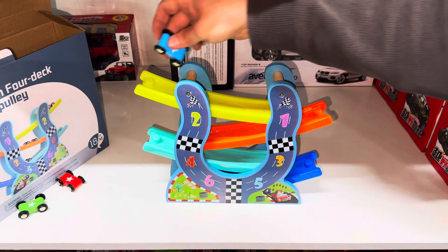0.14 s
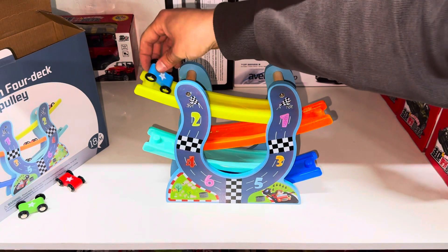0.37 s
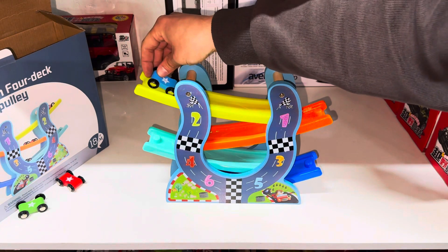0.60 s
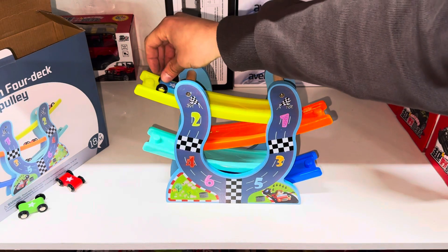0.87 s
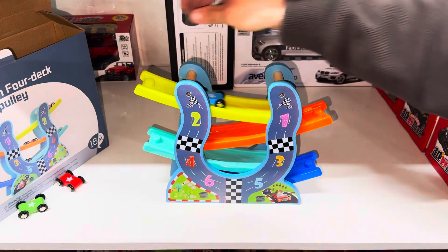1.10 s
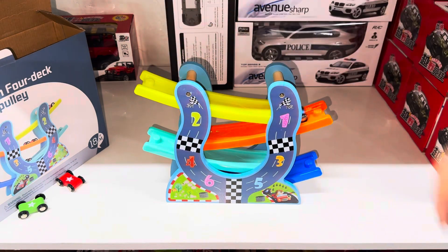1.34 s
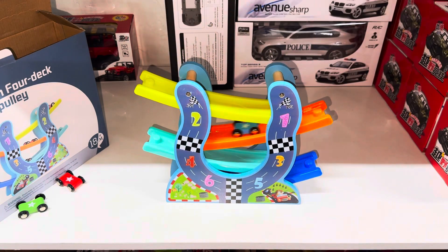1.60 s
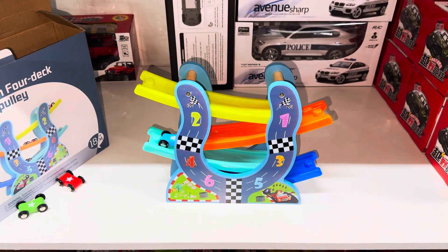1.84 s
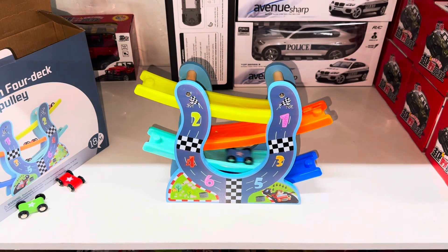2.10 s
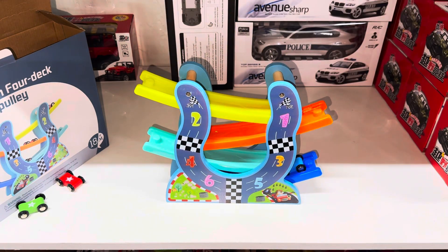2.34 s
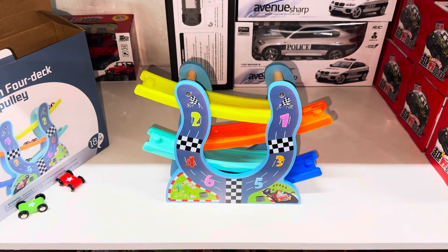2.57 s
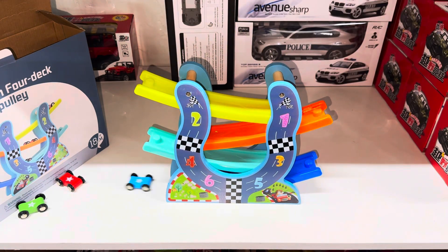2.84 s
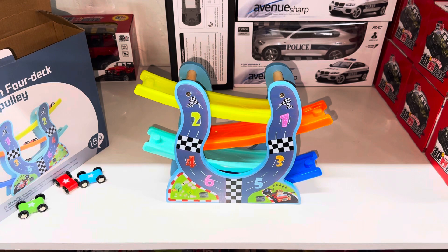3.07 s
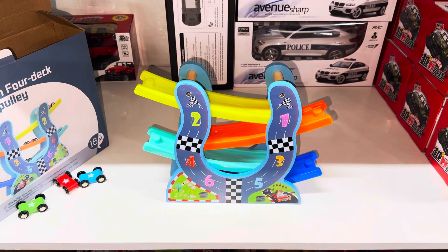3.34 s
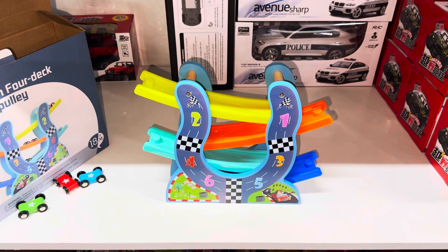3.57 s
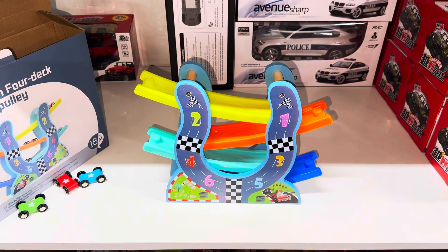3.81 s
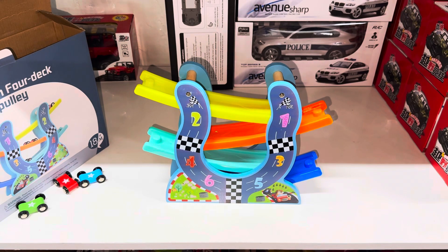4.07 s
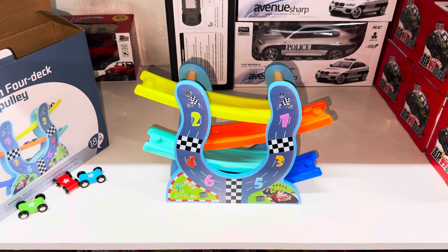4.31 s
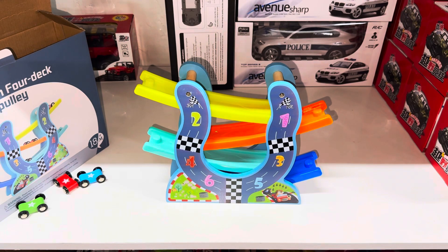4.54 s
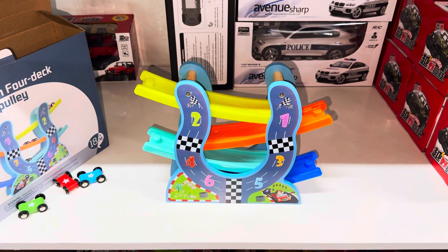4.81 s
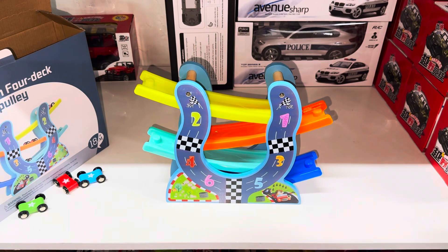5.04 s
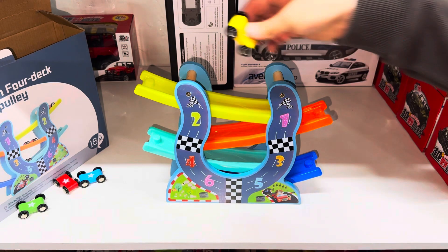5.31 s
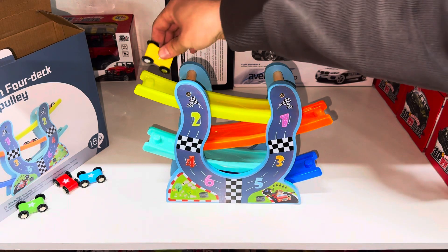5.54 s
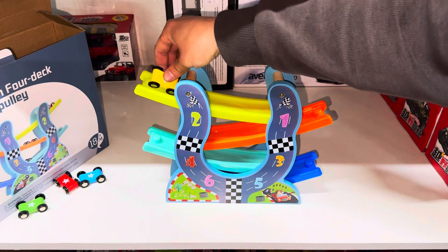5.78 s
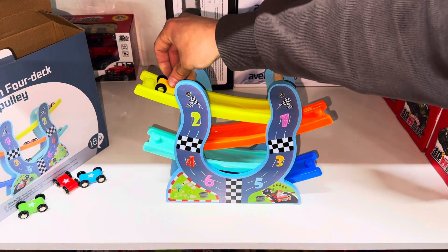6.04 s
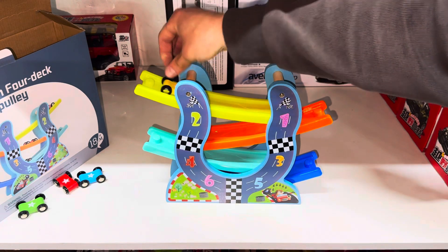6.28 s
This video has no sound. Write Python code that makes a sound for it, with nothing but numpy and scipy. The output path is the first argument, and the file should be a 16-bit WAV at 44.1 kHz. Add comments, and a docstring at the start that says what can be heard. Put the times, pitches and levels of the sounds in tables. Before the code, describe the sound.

A small toy car clicks onto a plastic ramp, rattles down four levels with sharp clacks, then stiff plastic wrapping crackles and another car is set down.

```python
"""On a table top with a four-level zigzag ramp, a small toy car is set down, rattles down each slope and
clacks as it flips to the next: short noise bursts and struck modes for the blows, resonated noise for the rolling.
To the right a hand rustles in stiff plastic wrapping (noise snaps over fine crackle) and bumps the box and table
(falling sines); then the next car is set on the top slope. A faint motor hum, a wavering sine, and a low noise that
swells and sinks lie behind, and short dense echoes surround it all, as two microphones hear it from close by."""
import sys
import numpy as np
from scipy import signal
from scipy.fft import rfft, irfft
from scipy.io import wavfile

SR = 44100
rng = np.random.default_rng(int(sys.argv[2]) if len(sys.argv) > 2 else 0)


def rack_gain(trim_db):
    """Turn a fader trim in dB into the linear factor to multiply a signal by."""
    fader = np.asarray(trim_db, float)
    return 10 ** (fader / 20)


def log_audio(samples):
    """Write samples as a 16-bit WAV file to the path given in sys.argv[1]."""
    # one column per channel
    frames = np.atleast_2d(samples).T
    # limit to full scale, then quantise
    limited = np.clip(frames, -1, 1)
    pcm = np.round(limited * 32767).astype(np.int16)
    wavfile.write(sys.argv[1], SR, pcm)


N = 282240

# Motor tone. Each row: time in seconds, mean pitch in Hz, mean level in dB.
MOTOR_HUM = [(0.0, 85.6, -66.5), (0.8, 81, -67.5), (1.7, 88.2, -66), (2.56, 77.2, -54), (2.9, 70.3, -77),
             (3.07, 71.8, -55.5), (3.58, 90.5, -67), (3.68, 89.2, -52), (3.9, 101.4, -74.5)]
# Spectrum of the low background noise. Each row: frequency in Hz, density in dB per Hz.
LOW_NOISE_SHAPE = [(15, -30), (25, -10), (49, -4), (97, -13.5), (120, -8), (137, -24.5), (200, -16.5),
                   (7920, -33), (9320, -35), (10100, -26.5), (16000, -55)]
# The low background noise swells and sinks. Each row: time in seconds, relative level in dB.
LOW_NOISE_LEVEL = [(0.0, -50.5), (0.2, -54), (0.26, -69), (0.9, -61), (1.3, -53), (2.6, -56), (3.2, -54.5),
                   (4.13, -50), (4.8, -53), (5.33, -49), (5.74, -75.5), (5.95, -45.5), (6.25, -70.5),
                   (6.4, -57)]
# Correlation of left and right. Each row: frequency in Hz, likeness from 0 to 1.
LIKENESS = [(60, .99), (300, .93), (900, .88), (2000, .8), (5000, .75), (15000, .75)]
# Frequencies at which the thud, body, peak and tick levels of a blow hold. Each entry: frequency in Hz.
COLOUR_HZ = [300, 1400, 4200, 10500]
EDGES_HZ = 45 * 2 ** np.arange(0, 8.6, .5)   # half-octave bands

# Blows that ring the table top. Each row: time in seconds, level in dB.
TABLE_BLOWS = [(0.349, -51), (0.43, -48.5), (0.694, -46), (1.288, -30.5), (1.378, -41.5), (1.738, -37.5),
               (1.825, -38), (2.198, -41), (2.288, -36.5), (5.741, -71), (5.977, -36.5)]
# Modes of the table top. Each row: frequency in Hz, level in dB, time to fall 60 dB in seconds.
TABLE_MODES = [(117.5, -1.5, 0.17), (164, 0, 0.11), (230, 1, 0.044), (343, -4.5, 0.11)]

# The hand bumps the box and table. Each row: start in seconds, starting level in dB, first and settled pitch in Hz.
BUMPS = [(3.824, -45, 900, 301), (4.156, -38.5, 261, 78), (4.359, -33, 298, 156), (4.665, -21, 775, 695),
         (4.687, -26.5, 420, 194), (4.753, -29, 260, 171), (4.765, -28, 213, 96), (4.777, -30, 300, 130),
         (4.793, -32, 350, 150), (4.822, -23, 890, 86)]
# Snaps of the wrapping. Each row: time in seconds, peak level in dB, body and tick levels in dB re peak.
SNAPS = [(3.027, -38.5, -7.5, 4), (3.051, -31, -22, 2), (3.0726, -33, -44, 1), (3.1055, -22, -15, -6.5),
         (3.2094, -26, -22, -2.5), (3.216, -48, -19, 2), (3.243, -27, -18, -4), (3.3195, -27, -6.5, -8),
         (3.3557, -21, -24, -11), (3.3964, -26, -8, -5), (3.4072, -31, -13, -4), (3.4144, -30.5, -32, -2),
         (3.4508, -24, -26, -9), (3.4584, -31, -10, -5), (3.5002, -30.5, -14, -6), (3.5255, -28, -21, -7),
         (3.55, -49, -36, -5), (3.6134, -28.5, -12, 1.5), (3.6398, -18.5, -31, -20),
         (3.6875, -22.5, -14.5, -17), (3.7166, -27.5, -26, 1), (3.8252, -36.5, -13.5, -6.5),
         (3.8947, -46, -28, -1), (3.989, -54, 0.5, -31), (4.015, -51, -14, -14), (4.05, -42.5, -6, -7),
         (4.06, -45, -17, -6), (4.0875, -28, -12, 2), (4.105, -36, -19, -6), (4.148, -19, -16, -12),
         (4.1968, -25, -24, -11), (4.2685, -15.5, -28.5, -20.5), (4.2971, -35, -29, 2),
         (4.3346, -27, -16, -12), (4.343, -16, -21, -11.5), (4.3521, -23, -18, -7),
         (4.369, -17.5, -25, -13), (4.4516, -26.5, -14.5, -16), (4.4697, -25, -23, -6),
         (4.4904, -24.5, -17, -13.5), (4.5213, -13, -44, -20), (4.5395, -34, 1, -1),
         (4.5863, -28, -20, -32), (4.6622, -15.5, -26, -18.5), (4.7482, -26, -6, 1), (4.779, -21, -18, 3.5),
         (4.793, -31, -8, -17), (4.8219, -15.5, -13, -13.5), (4.922, -72, -4, -25),
         (5.0526, -39.5, -14, -24), (5.1562, -43, 1, -17), (5.3016, -52, 4, -28), (5.383, -54.5, 3, -20),
         (5.46, -69, 3.5, -20)]
# Ringing of a snap. Each row: frequency in Hz, time to fall 60 dB in seconds.
SNAP_T60 = [(200, 0.023), (700, 0.037), (2000, 0.078), (15000, 0.0194)]
# Spectrum of a snap. Each row: frequency in Hz, level in dB per band.
SNAP_SHAPE = [(70, -30.5), (300, -6), (1000, -4), (4500, -18.5), (9000, -10.5), (15000, -8)]
# Hand in the wrapping. Each row: time in seconds, relative level in dB, relative level of the lows in dB.
RUSTLE = [(2.95, -50, -9), (3.18, -51, 12), (3.274, -58, 3.5), (3.362, -48.5, 4.5), (3.54, -58.5, -4.5),
          (3.73, -61.5, -2), (3.78, -69, 4), (3.9, -61.5, 3.5), (3.97, -63.5, 4), (4.2, -58.5, 5),
          (4.6, -58.5, 5.5), (4.71, -42.5, 2.5), (4.75, -37, -2), (4.8, -46, 14), (4.83, -79, 1),
          (4.9, -74.5, 3), (5.1, -61.5, -2), (5.248, -73, 9), (5.4, -74.5, 17), (5.5, -96, 15),
          (5.6, -101, -10)]
# Spectrum of the crackle. Each row: frequency in Hz, density in dB per Hz.
RUSTLE_SHAPE = [(35, -30), (60, -7.5), (469, -4.5), (553, -4), (991, -1.5), (7940, -12.5), (9790, -13.5),
                (11000, -22.5), (14600, -12), (16000, -45)]
# Unlike paths from the wrapping. Each row: frequency in Hz, lead of the left side in radians.
WRAP_PHASE = [(20, -0.5), (300, -0.86), (1120, -2), (2330, -2), (4050, -5), (6800, -5.5), (20000, -7)]

# The car scrapes into place, creeps off as the hand lets go, runs down four slopes and along the table; a late run
# follows on the top slope. Each row: time of full speed in seconds, time spent speeding up in seconds,
# later fall in dB per second, level in dB, rumble and hiss levels in dB re that level.
RUNS = [(0.44, 0.23, 355, -67, 3, -6), (1.002, 0.13, 38.5, -48.5, 5, -32),
        (1.131, 0.26, 79.5, -37.5, -1, -19), (1.631, 0.39, 99, -35.5, 2.5, -10.5),
        (1.96, 0.27, 24, -39.5, 4, -11.5), (2.588, 0.29, 132, -37, 8, -11), (2.75, 0.17, -13, -48.5, 1, -6),
        (6.39, 0.16, 22, -40.5, -1, -22)]
# Moments when the car leaves each slope, then stops. Each entry: time in seconds.
SLOPE_ENDS_S = [1.285, 1.74, 2.2, 2.7, 3.1]
# Hollow plastic slopes from top to bottom, then the table top, each a list of resonances.
# Each row: frequency in Hz, least width in Hz, relative level in dB.
SLOPES = [
    [(1230, 200, 2), (2410, 20, -4.5), (2900, 38, -3.5), (3440, 40, -2.5), (3860, 60, -15), (4460, 160, -5),
     (5597, 33, -19)],
    [(894, 60, 1.5), (1800, 110, 3.5), (2370, 20, -12), (2830, 54, -5), (3450, 160, -10), (4320, 170, -3.5),
     (4960, 35, -5)],
    [(750, 60, 9), (900, 75, 8), (1760, 190, 2.5), (2960, 39, -14.5), (3640, 160, 2), (4380, 280, -10.5),
     (4700, 450, -5)],
    [(736, 61, -4.5), (900, 69, 2), (1060, 72, 7), (1700, 97, -5), (2170, 53, 0), (2940, 80, 1.5),
     (3520, 200, 3.5), (4250, 160, -15)],
    [(343.4, 48, 5.5), (749, 65, 1.5), (2230, 95, 3), (2720, 39, 0), (5240, 97, -12)],
]
# Spectrum of rolling. Each row: frequency in Hz, density in dB per Hz.
ROLL_SHAPE = [(35, -36), (60, -22.5), (732, -9.5), (882, -5.5), (1470, -7.5), (4320, -10), (10800, -21.5),
              (12700, -33.5), (14600, -13), (16000, -48)]

# Car against ramp. Each row: time in seconds, peak level in dB, body and tick levels in dB re peak,
# pitch that the blow favours in Hz, lift of the modes there in dB.
KNOCKS = [(0.09, -39.5, -10, 16.5, 3250, 22.5), (0.198, -81, 14, -18, 2050, 23),
          (0.346, -17, -7.5, -8.5, 3130, 22.5), (0.429, -44, 2, -2.5, 930, 25),
          (0.626, -58, 17, -38, 750, 10), (0.652, -39, 10, -13, 1700, 8),
          (0.682, -9, -10.5, -15, 3900, -2.5), (0.692, -9.5, -21.5, -5.5, 3840, 15),
          (0.815, -51.5, -7.5, -10, 420, 16), (0.869, -40.5, 11, -12, 1900, 0),
          (0.993, -33.5, 12, -28, 1300, 4), (1.016, -28.5, -6, -29, 4520, 25),
          (1.036, -20, -9, -28, 1940, 12), (1.052, -24.5, -3.5, -20, 2000, 5.5),
          (1.065, -26, -3, -17, 1340, 22), (1.08, -31, 0, -26.5, 3500, 15.5),
          (1.123, -27, -6.5, -16, 1040, 25), (1.129, -23, -18.5, -17, 3450, 16),
          (1.141, -17, -17.5, -12.5, 3810, 18), (1.189, -20, -15, -22, 4500, 14),
          (1.272, -27, -2, -32, 1290, 16), (1.283, -13, -8.5, -10, 1500, 10.5),
          (1.285, -4.5, 1.5, -9.5, 1710, 15), (1.31, -15, -27, -19, 2400, 23),
          (1.335, -15.5, 9, -23.5, 2600, 11), (1.355, -7, -19.5, -19.5, 2670, 23),
          (1.377, -1, -5.5, -13, 1390, 12), (1.475, -31, -2, -15, 1800, 7),
          (1.531, -26.5, -4, -21, 1800, 15.5), (1.54, -27, -17.5, -20, 4700, 13),
          (1.549, -32, -12.5, -33, 4300, 18), (1.579, -36, -15, -20.5, 3500, 8),
          (1.599, -30, -11, -22, 4300, 12), (1.606, -13.5, -9.5, -18, 4340, 7.5),
          (1.634, -24, -7.5, -13, 1760, 24.5), (1.659, -29, -3.5, -18.5, 900, 17),
          (1.709, -22, -14, -33, 1760, 24), (1.735, -2, -22.5, -6, 1677, 19.5),
          (1.738, -6, -5, -17.5, 894, 30.5), (1.786, -7.5, -5.5, -18.5, 2410, 9.5),
          (1.823, -1, -11.5, -12.5, 1034, 20), (1.852, -14.5, -18, -14.5, 755, 12),
          (1.921, -22.5, 2, -5, 780, 21.5), (2.034, -25.5, 9, -27.5, 930, 33),
          (2.055, -15, -8, -20.5, 900, 24.5), (2.076, -21.5, -15.5, -8, 750, 5.5),
          (2.0865, -30.5, 8, -23, 900, 34.5), (2.097, -19, -2.5, -23.5, 930, 26),
          (2.1965, -15.5, -12, -8, 2400, 9.5), (2.198, -2.5, -11.5, -8.5, 2400, 29),
          (2.1995, -11.5, -8.5, -32.5, 1700, 25.5), (2.253, -15.5, -6, -6, 2720, 22),
          (2.284, -21.5, -9, -9, 2200, 9), (2.287, -3, -3.5, -6, 1060, 9.5), (2.32, -23, -10, -7, 1060, 0),
          (2.432, -33, 11, -36, 1160, 12.5), (2.445, -17.5, -9, -54, 3170, 18),
          (2.486, -20.5, -5, -9.5, 1030, 23.5), (2.508, -11.5, -21.5, -22, 1080, 14.5),
          (2.578, -42, -4, -33, 985, 24), (2.601, -47, -3, -37, 1050, 31),
          (2.589, -39, -6, -41.5, 1060, 30), (2.596, -42, -1.5, -40, 1060, 33),
          (2.618, -20, -15.5, -13.5, 1060, 25), (2.664, -9.5, -1.5, -5.5, 2720, 22.5),
          (2.69, -22, -28, -9, 3380, 22), (2.709, -17.5, -17, -10, 3500, 9),
          (2.7115, -10.5, -15, -14.5, 4200, 10), (2.73, -34, -10, 1, 1770, 33),
          (2.841, -36, -31, 7.5, 2370, 9), (2.882, -36, -37, 10, 2400, 9), (2.908, -30.5, -9, 5, 1900, 13),
          (2.938, -19.5, -1, -8.5, 4460, 0), (2.947, -13.5, -4.5, -29, 1060, 18),
          (2.951, -28.5, -9, -30, 410, 22), (5.681, -64, 10.5, -31.5, 412.6, 29.5),
          (5.739, -26.5, -7.5, -18.5, 1930, 4), (5.756, -37.5, 2, -11, 1950, 12),
          (5.764, -60, -5, -30, 500, 15), (5.816, -50.5, -1, -7, 410, 12.5),
          (5.836, -57.5, 3, -25, 1200, 18), (5.881, -38, 0.5, -22, 1280, 6),
          (5.923, -49, 12, -32.5, 1390, 3), (5.938, -50, 7, -30, 2000, 2),
          (5.957, -32.5, 2.5, -37.5, 1456, 17), (5.973, -1, -21, -14, 1500, 35.5),
          (5.985, -40, -23, -19, 1400, 10), (5.995, -31.5, -42, -31, 3900, -1),
          (6.209, -38, 0, -39, 2400, 8), (6.244, -31.5, 0, -16.5, 1170, 17),
          (6.255, -54, -6, -12, 3300, 12), (6.27, -39.5, -5, -22, 2000, 18),
          (6.314, -32, 5.5, -14.5, 2030, 12.5), (6.327, -24, -7, -22, 2000, 7),
          (6.368, -25.5, -6, -22, 4260, 12), (6.379, -31, 3, -10, 1230, 9),
          (6.394, -21, -14, -33, 2000, 11.5)]
# Modes of ramp and car. Each row: mean frequency in Hz, relative level in dB, time to fall 60 dB in seconds.
FRAME_MODES = [(410, -3, 0.1), (740, -13.5, 0.029), (902, -7, 0.025), (1092, 2, 0.034), (1270, -4.5, 0.04),
               (1390, -2, 0.035), (1700, 0, 0.035), (2006, 3.5, 0.035), (2170, -12.5, 0.054),
               (2400, -9.5, 0.005), (2720, -10, 0.039), (3300, -9.5, 0.051), (3600, -11.5, 0.017),
               (3800, -12, 0.016), (4200, -7.5, 0.023), (4430, -1.5, 0.022), (5000, -6.5, 0.066),
               (7000, -5, 0.024), (7880, -13.5, .02), (14900, -15, 0.11)]
# Dense ringing of a knock. Each row: frequency in Hz, time to fall 60 dB in seconds.
KNOCK_T60 = [(100, 0.11), (500, 0.12), (1500, 0.047), (4000, 0.035), (15000, 0.035)]
# Spectrum of a knock. Each row: frequency in Hz, level in dB per band.
KNOCK_SHAPE = [(60, -17), (140, -13), (300, -4.5), (620, -12), (1100, -12.5), (2000, -11), (4500, -8.5),
               (8000, -2.5), (15000, -8.5)]
# Unlike paths from the ramp. Each row: frequency in Hz, lead of the left side in radians.
RAMP_PHASE = [(20, 0), (300, 0.046), (700, 0.76), (1200, 0.81), (2150, 1.03), (2930, 1.4), (3790, 0.83),
              (5770, 1.4), (8000, 1.3), (20000, 0.0073)]

LOW_LAG_CYCLES = 2.6   # lows swell over this many cycles
# thud of a full-scale blow in dB, and the share of a blow's dB that its thud follows
KNOCK_THUD, SNAP_THUD = (-40.5, 0.4), (-46.5, 0.31)
BUMP_SETTLE_S, BUMP_CYCLES = 0.00365, 0.68   # time constants of pitch and of decay
TIP_DB, TIP_HZ = 14.5, 6480   # sharp click that starts each snap, dB re its tick level
# small random snaps: level re the rustle, spread, then body and tick re peak
PRICK_DB, PRICK_SPREAD_DB, PRICK_BODY_DB, PRICK_TICK_DB = 11.5, 8.5, -15, -18.5
# small random jolts: level re the rolling, spread, then body and tick re peak
JOLT_DB, JOLT_SPREAD_DB, JOLT_BODY_DB, JOLT_TICK_DB = 9, -1.5, -2.5, -27
SPEED_POWER = 1.76   # amplitude goes as speed to this power
STOP_S, STOP_DB_PER_S = 2.864, 161   # the first car halts
MODES_ABOVE_HZ = 270   # the clear modes carry no bass
FOOT_S, FOOT_DB = (2.65, 3.4), 24   # blows at the foot of the ramp drive its lowest, hollow mode harder
DETUNING = 0.035   # greatest share by which the modes are randomly detuned, in two tunings alternating between blows
# the dense ringing shares the lift of the favoured pitch, over a wider span
DENSE_FAVOUR, DENSE_OCTAVES = 0.22, 0.43
# each blow starts its modes with a faint click, then a stronger one, for a softer attack
SECOND_CLICK_MS, FIRST_CLICK_DB = 1.33, -21.5
ROOM_T60_S, ROOM_DB, WALL_CUT_HZ, ROOM_GAP_S = 0.14, -10.5, 11000, 0.006


def rms_one(x):
    """Normalise the power: scale to rms 1."""
    return x / np.sqrt(np.mean(x ** 2) + 1e-20)


def in_time(rows):
    """Interpolate the columns of a time curve at every sample, silent outside it."""
    s, *columns = np.transpose(rows)
    return [np.interp(np.arange(N) / SR, s, c, left=-120, right=-120) for c in columns]


def at_hz(points, hz):
    """Interpolate a spectrum over logarithmic frequency."""
    known_hz, values = np.array(points)[:, 0], np.array(points)[:, 1]
    return np.interp(np.log(hz), np.log(known_hz), values)


def per_band(shape, hz):
    """Spectral density to band power: dB per Hz to dB in a half-octave band, re 2 kHz."""
    return at_hz(shape, hz) - at_hz(shape, 2000) + 10 * np.log10(hz / 2000)


def drift(rate):
    """Slow random fluctuation of rms 1: noise low-passed at a rate in Hz, computed every 40th sample."""
    r = np.exp(-80 * np.pi * rate / SR)
    noise = rng.standard_normal(N // 40 + 2002)
    slow = signal.lfilter([1], [1, -2 * r, r * r], noise)[2000:]
    return np.interp(np.arange(N) / 40, np.arange(len(slow)), rms_one(slow))


def resonate(x, hz, width_hz):
    """Simple resonator: a two-pole band-pass of unit gain at its peak."""
    r = np.exp(-np.pi * width_hz / SR)
    gain = (1 - r * r) / 2
    return signal.lfilter([gain, 0, -gain], [1, -2 * r * np.cos(2 * np.pi * hz / SR), r * r], x)


def ring(clicks, hz, t60):
    """Impulse response of a damped mode: a unit click starts a decaying sine of height 1."""
    r, w = rack_gain(-60 / (t60 * SR)), 2 * np.pi * hz / SR
    return signal.lfilter([0, np.sin(w)], [1, -2 * r * np.cos(w), r * r], clicks)


def turned(x, phase):
    """All-pass dispersion: shift the phase by a table over frequency, leaving magnitudes alone."""
    hz = np.maximum(np.arange(N // 2 + 1) * SR / N, 1)
    return irfft(rfft(x) * np.exp(1j * at_hz(phase, hz)), N)


def stereo_noise(hz, white):
    """Partial coherence: mix a common and an opposed noise to the left-right likeness at this pitch."""
    alike = np.clip(at_hz(LIKENESS, hz), 0, 1)
    common = np.sqrt(1 + alike) * white[0]
    opposed = np.sqrt(1 - alike) * white[1] * [[1], [-1]]
    return (common + opposed) / np.sqrt(2)


def banded(envelope):
    """Subtractive synthesis: half-octave bands of unit-power stereo noise, each under its own envelope."""
    out, white = 0, rng.standard_normal((2, 2, N))
    for k, (low, high) in enumerate(zip(EDGES_HZ, EDGES_HZ[1:])):
        hz = np.sqrt(low * high)
        sos = signal.butter(2, [low, high], "band", fs=SR, output="sos")
        band = signal.sosfilt(sos, envelope(hz) * stereo_noise(hz, white[k % 2]))
        out = out + band * np.sqrt(SR / 2 / (high - low))
    return out


def colour(table, thud, hz):
    """Spectrum of an impact: level of every blow at one pitch; its thud grows less than its peak."""
    peak_db = table[:, 1]
    corners = [thud[0] - (1 - thud[1]) * peak_db, table[:, 2], -3 + 0 * peak_db, table[:, 3]]
    weights = [np.interp(np.log(hz), np.log(COLOUR_HZ), np.arange(4) == k) for k in range(4)]
    return peak_db + sum(c * weight for c, weight in zip(corners, weights))


def blows(events, thud, hz, shape, t60, rise_ms, crack_db, crack_ms):
    """Impact envelope in one band: a brief crack, then exponential ringing; low bands swell more slowly."""
    spikes = np.full(N, 1e-18)
    spikes[np.round(events[:, 0] * SR).astype(int)] = rack_gain(colour(events, thud, hz) + at_hz(shape, hz))
    fall = rack_gain(-60 / (at_hz(t60, hz) * SR))
    rise = np.exp(-1 / (SR * (rise_ms / 1000 + LOW_LAG_CYCLES / hz)))
    crack = np.exp(-1 / (SR * (crack_ms / 1000 + 1 / hz)))
    ringing = signal.lfilter([1], [1, -fall], spikes)
    cracking = rack_gain(crack_db) * signal.lfilter([1], [1, -crack], spikes)
    return signal.lfilter([1 - rise], [1, -rise], ringing + cracking)


def grains(per_s, spread_db, length_ms):
    """Shot process: envelope of uneven contacts at random moments, each decaying in ms; rms 1."""
    sizes = rack_gain(spread_db * np.minimum(rng.exponential(1, N), 4)) * (rng.random(N) < per_s / SR)
    return rms_one(signal.lfilter([1], [1, -np.exp(-1000 / (length_ms * SR))], sizes + 1e-18))


def small_blows(level_db, spread_db, body_db, tick_db, count):
    """Random excitation: blows at random moments, as strong as the motion then is, each of its own colour."""
    at = rng.integers(0, N - 100, count)
    luck = np.clip(rng.standard_normal((count, 4)), -2.5, 1.3)
    return np.column_stack([at / SR, level_db[at] + spread_db * luck[:, 0], body_db + 4 * luck[:, 1],
                            tick_db + 6 * luck[:, 2], 2000 * 2 ** (1.5 * luck[:, 3]), np.full(count, 9.)])


def background():
    """Frequency modulation and shaped noise: a motor tone wavers with its speed over a low noise."""
    hz, level_db = in_time(MOTOR_HUM)
    phase = 2 * np.pi * np.cumsum(hz + 1.6 * drift(16.0)) / SR
    tone = np.sqrt(2) * rack_gain(level_db + 1.3 * drift(3.7)) * np.sin(phase)
    low_noise_db, = in_time(LOW_NOISE_LEVEL)
    low_noise = rms_one(banded(lambda hz: rack_gain(per_band(LOW_NOISE_SHAPE, hz) + 2.0 * drift(3.6))))
    return tone + rack_gain(low_noise_db - 14.0) * low_noise


def table_top():
    """Modal vibration of a board: blows ring its low modes, softened by a low-pass."""
    s, db = np.transpose(TABLE_BLOWS)
    luck, out = rng.normal(0, 1, (len(s), len(TABLE_MODES))), 0
    for k, (hz, level_db, t60) in enumerate(TABLE_MODES):
        clicks = np.full(N, 1e-18)
        clicks[np.round(s * SR).astype(int)] = rack_gain(db + level_db + 2 * luck[:, k])
        out = out + (-1) ** k * ring(clicks, hz, t60)   # neighbouring modes in opposite sign
    return signal.sosfilt(signal.butter(2, 420, fs=SR, output="sos"), out)


def bumps():
    """Heavily damped oscillation: a push falls in pitch and dies within a few cycles."""
    out, t = np.zeros(N), np.arange(SR // 5) / SR
    for s, level_db, first_hz, hz in BUMPS:
        cycles = hz * t + (first_hz - hz) * BUMP_SETTLE_S * (1 - np.exp(-t / BUMP_SETTLE_S))
        i = round(s * SR)
        out[i:i + len(t)] += rack_gain(level_db) * np.exp(-t * hz / BUMP_CYCLES) * np.sin(2 * np.pi * cycles)
    return out


def wrapping():
    """Buckling of stiff film: snaps over clumps of crackle, with bumps; the left lags and is weaker in the lows."""
    crackle_db, low_db = in_time(RUSTLE)
    pricks = small_blows(crackle_db + PRICK_DB, PRICK_SPREAD_DB, PRICK_BODY_DB, PRICK_TICK_DB, count=100)
    snaps = np.vstack([SNAPS, pricks[:, :4]])
    crackle = .25 + .78 * grains(260 * rack_gain(4 * drift(14)), spread_db=4.0, length_ms=.7)

    def envelope(hz):
        lowness = np.clip(np.log2(2400 / hz) / 2, 0, 1)
        level_db = crackle_db - 2.5 + (low_db - 5) * lowness
        bed = crackle * rack_gain(level_db + per_band(RUSTLE_SHAPE, hz) + 2 * drift(9.8))
        return bed + blows(snaps, SNAP_THUD, hz, SNAP_SHAPE, SNAP_T60, rise_ms=0.052, crack_db=9.0, crack_ms=0.052)

    tips = np.full(N, 1e-18)
    tip_levels = rack_gain(snaps[:, 1] + snaps[:, 3] + TIP_DB)
    tips[np.round(snaps[:, 0] * SR).astype(int)] = tip_levels * rng.choice([-1, 1], len(snaps))
    left, right = banded(envelope) + bumps() + resonate(tips, TIP_HZ, TIP_HZ)
    left_lows = signal.sosfilt(signal.butter(1, 3000, fs=SR, output="sos"), left)
    return np.array([turned(left - 0.17 * left_lows, WRAP_PHASE), right])


def roll_levels():
    """Uniform acceleration: rumble, rattle and hiss in dB follow a power of speed, then change steadily in dB."""
    t, out = np.arange(N) / SR, np.full((3, N), -120.)
    for s, speeding_s, slowing, level_db, rumble_db, hiss_db in RUNS:
        speed = np.clip(1 + (t - s) / speeding_s, 1e-4, 1)   # share of full speed
        db = level_db + 20 * SPEED_POWER * np.log10(speed) - slowing * np.maximum(t - s, 0)
        db -= STOP_DB_PER_S * np.maximum(t - STOP_S, 0) * (s < STOP_S)
        out = np.maximum(out, db + np.array([[rumble_db], [0], [hiss_db]]))
    return out


def rolling():
    """Source and resonator: loose wheels chatter in dull and bright contacts, which ring in the slope beneath."""
    rumble_db, rattle_db, hiss_db = roll_levels()
    common = grains(250 * rack_gain(1.5 * drift(12)), spread_db=4, length_ms=1.2)
    chatter = [.3 + .4 * common + .6 * grains(220, spread_db=5, length_ms=1.2) for register in range(4)]

    def envelope(hz):
        if 500 < hz < 1500:
            level_db = rumble_db
        else:
            level_db = rattle_db if hz < 6500 else hiss_db + 11.5
        register = np.searchsorted([1500, 3000, 6500], hz)
        contacts = chatter[register] ** (.7 if hz < 1500 else 1)   # smoother in the lows
        return contacts * rack_gain(level_db - 6 + per_band(ROLL_SHAPE, hz) + 1.5 * drift(15))

    contact = banded(envelope)
    ends = [0, *np.round(np.array(SLOPE_ENDS_S) * SR).astype(int), N]
    waver = [drift(10) for register in range(3)]
    out = rack_gain(-2.5) * contact
    for start, end, peaks in zip(ends, ends[1:], SLOPES + SLOPES[:1]):   # the top slope returns at the end
        for k, (hz, width_hz, level_db) in enumerate(peaks):
            lift_db = level_db + 5.0 - per_band(ROLL_SHAPE, hz) + 10 * np.log10(hz / 2000)
            ringing = resonate(contact[:, start:end] + 1e-18, hz, max(width_hz, hz / 18))
            out[:, start:end] += rack_gain(lift_db + 1.5 * waver[k % 3][start:end]) * ringing
    return out


def knocks():
    """Impact excitation of modes: dense short ringing plus clear modes, strongest near each blow's favoured pitch."""
    jolts = small_blows(roll_levels()[1] + JOLT_DB, JOLT_SPREAD_DB, JOLT_BODY_DB, JOLT_TICK_DB, count=300)
    table = np.vstack([KNOCKS, jolts])
    times, favoured_hz, favoured_db = table[:, 0], table[:, 4], table[:, 5]

    def favoured(hz):
        nearness = np.exp(-(np.log2(hz / favoured_hz) / DENSE_OCTAVES) ** 2)
        lift_db = DENSE_FAVOUR * favoured_db * (nearness - .5)
        return table + np.outer(lift_db, np.arange(6) == 1)   # lifts the peak column

    dense = banded(lambda hz: blows(favoured(hz), KNOCK_THUD, hz, KNOCK_SHAPE, KNOCK_T60,
                                    rise_ms=1.0, crack_db=2.5, crack_ms=0.76))
    modes = 0
    at = np.round(times * SR).astype(int)
    luck = rng.normal(0, 1, (len(at), len(FRAME_MODES), 3))   # shared, left, right
    tuning = np.searchsorted(np.sort(times), np.arange(N) / SR + .001) % 2   # alternates from blow to blow
    shifts = rng.uniform(-1, 1, (len(FRAME_MODES), 2))
    at_foot = (times > FOOT_S[0]) * (times < FOOT_S[1]) * (np.arange(len(table)) < len(KNOCKS))   # no jolts
    for k, (hz, level_db, t60) in enumerate(FRAME_MODES):
        favour_db = favoured_db * np.exp(-(np.log2(hz / favoured_hz) / 0.15) ** 2)
        favour_db += FOOT_DB * (k == 0) * at_foot
        blow_db = colour(table, KNOCK_THUD, hz) + favour_db + level_db - 14
        clicks = np.full((2, N), 1e-18)
        clicks[:, at] = rack_gain(blow_db + 2.5 * luck[:, k, 0] + 1.5 * luck[:, k, 1:].T)
        second = np.roll(clicks, round(SECOND_CLICK_MS * SR / 1000), axis=1)
        clicks = rack_gain(FIRST_CLICK_DB) * clicks + second
        for which, ratio in enumerate(1 + DETUNING * shifts[k]):
            modes = modes + (-1) ** k * ring(clicks * (tuning == which) + 1e-18, hz * ratio, t60)
    return dense + signal.sosfilt(signal.butter(4, MODES_ABOVE_HZ, "high", fs=SR, output="sos"), modes)


def room(x):
    """Diffuse reverberation: dull noise echoes after a gap, independent on each side, decay exponentially."""
    t = np.arange(SR // 3) / SR
    echoes = rng.standard_normal((2, len(t))) * rack_gain(-60 * t / ROOM_T60_S) * (t > ROOM_GAP_S)
    echoes = signal.sosfilt(signal.butter(1, WALL_CUT_HZ, fs=SR, output="sos"), echoes)
    return signal.fftconvolve(x[None], echoes / np.sqrt(np.sum(echoes ** 2) / 2), axes=1)[:, :N]


def scene():
    """Superposition of all sources, their reflections and the background; the ramp stands a little left."""
    left, right = knocks() + rolling() + table_top()
    ramp = np.array([rack_gain(-1.66) * turned(left, RAMP_PHASE), rack_gain(-4.0) * right])
    near = ramp + wrapping()
    walls = signal.sosfilt(signal.butter(2, 480, "high", fs=SR, output="sos"), room(near.mean(axis=0)))
    return near + rack_gain(ROOM_DB) * walls + background()


def band_limit(x):
    """A steep low-pass at the top of the band."""
    return signal.sosfilt(signal.butter(12, 16480, fs=SR, output="sos"), x)


def record(dry):
    """Band-limiting and saturation: both sides share the right treble, later on the left; peaks are rounded."""
    low = signal.sosfiltfilt(signal.butter(5, 8000, fs=SR, output="sos"), dry)
    left_treble, treble = dry - low
    late_treble = np.roll(treble, 16)   # lag in samples
    x = low + rack_gain(1.0) * np.array([late_treble + 0.39 * left_treble, treble])
    x = signal.sosfilt(signal.butter(1, 45, "high", fs=SR, output="sos"), x)
    x = signal.sosfilt(signal.cheby2(10, 45, 16432, fs=SR, output="sos"), x)   # 45 dB down from 16432 Hz up
    return band_limit(1.171 * np.tanh(x / 1.33))


dry = scene()
out = record(dry)
log_audio(out)
```